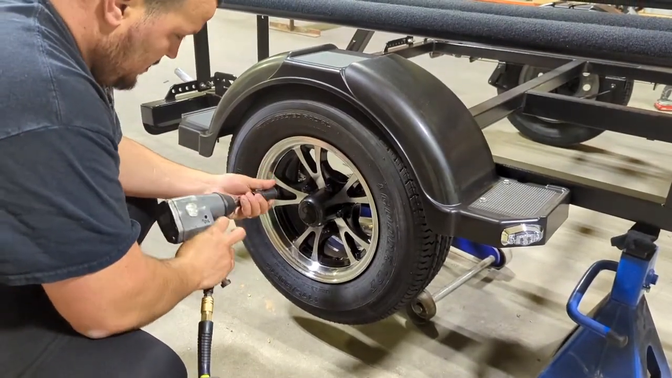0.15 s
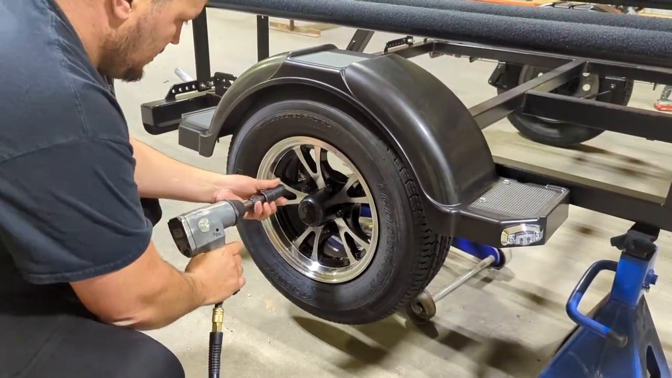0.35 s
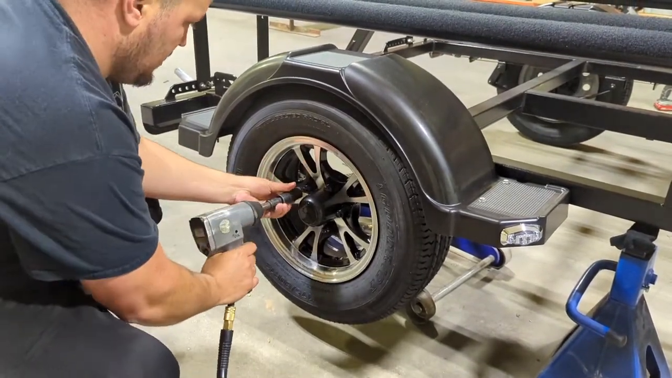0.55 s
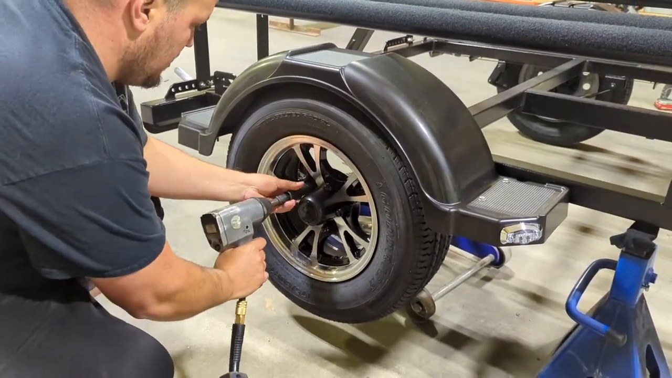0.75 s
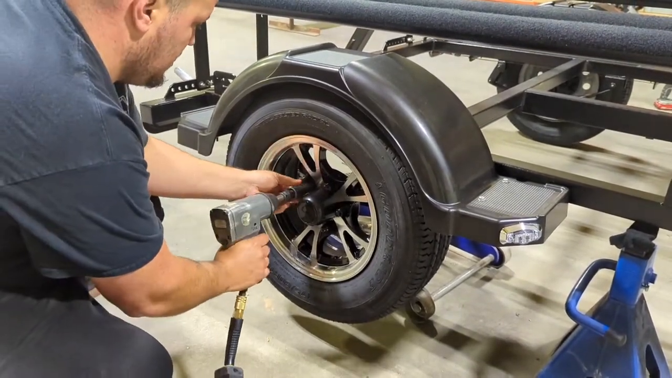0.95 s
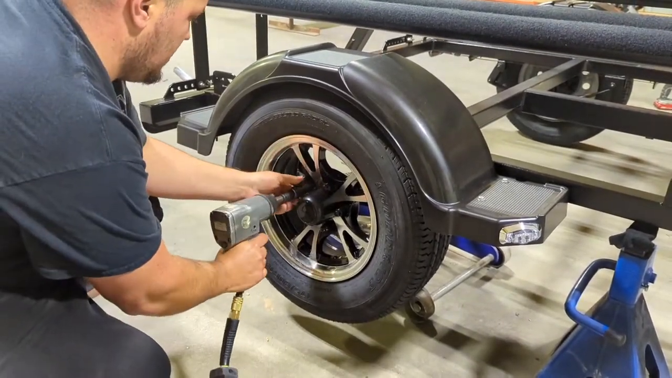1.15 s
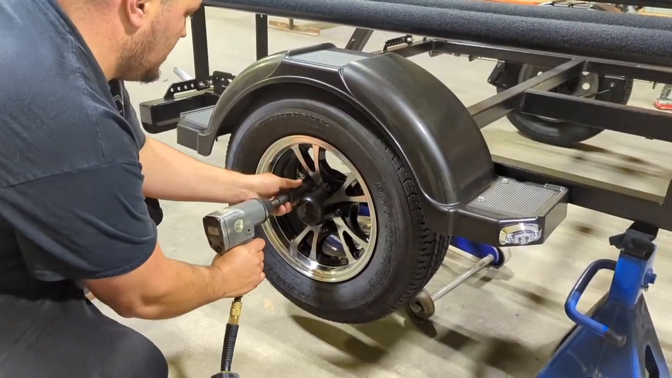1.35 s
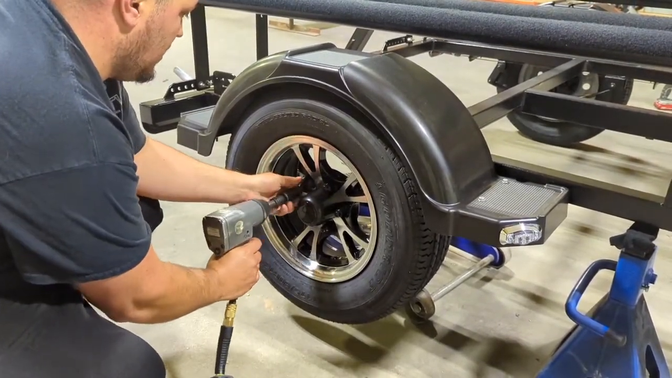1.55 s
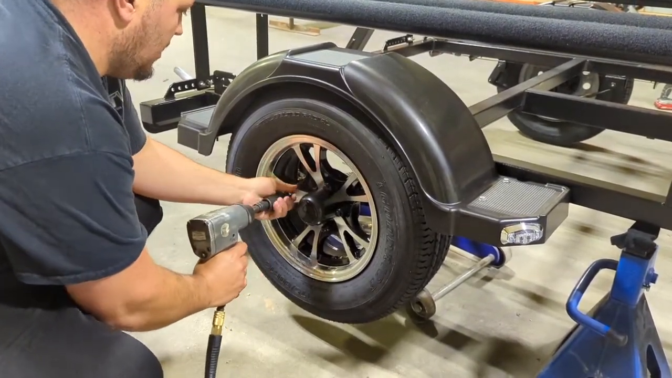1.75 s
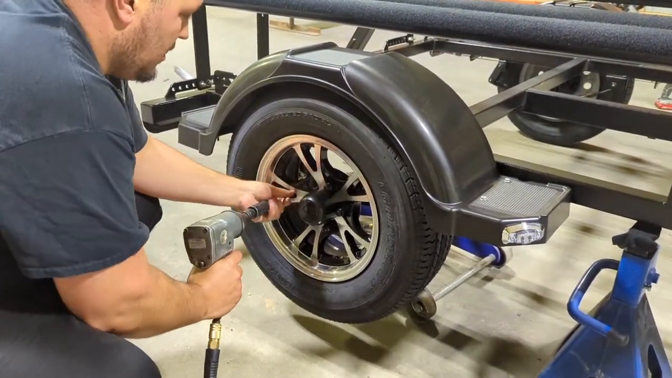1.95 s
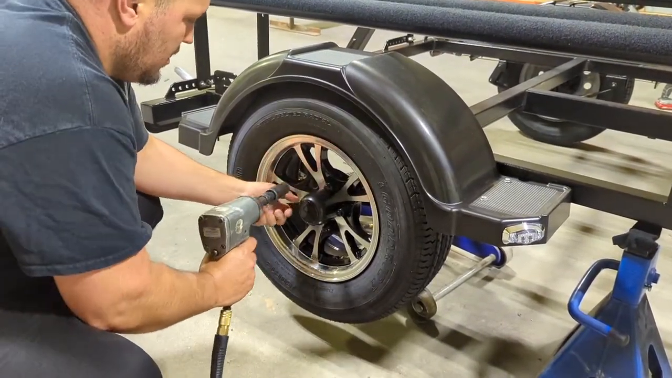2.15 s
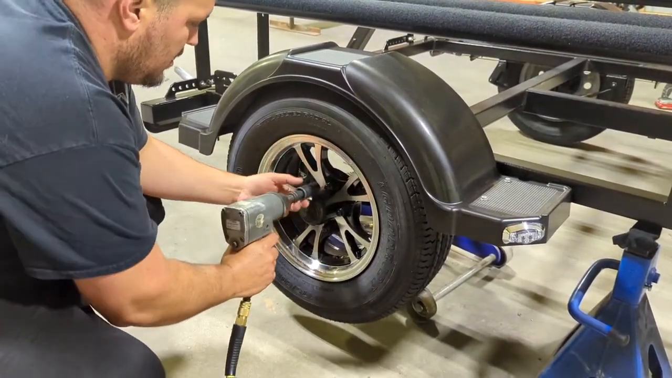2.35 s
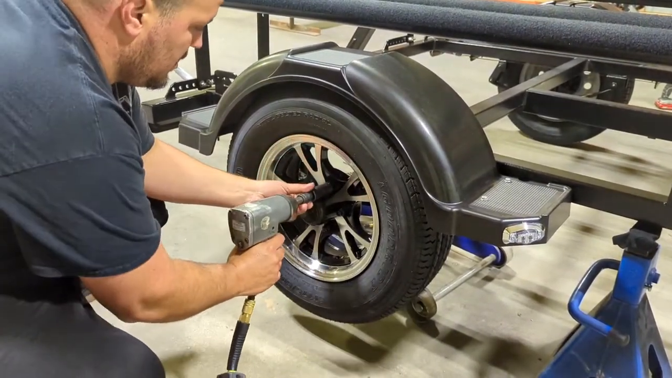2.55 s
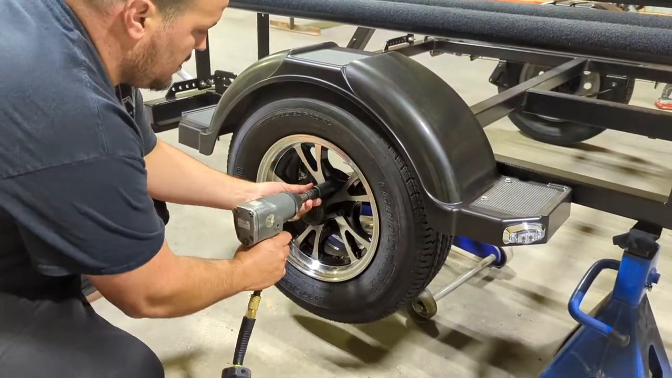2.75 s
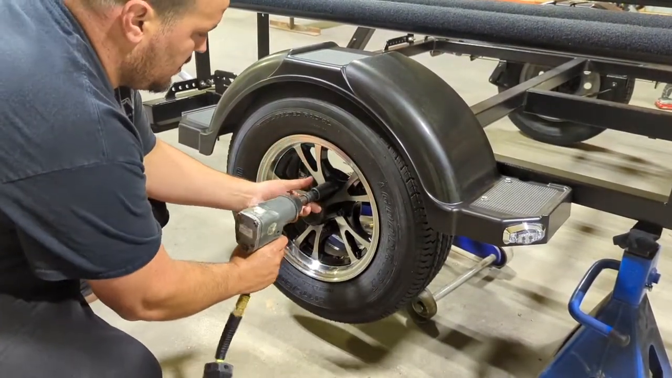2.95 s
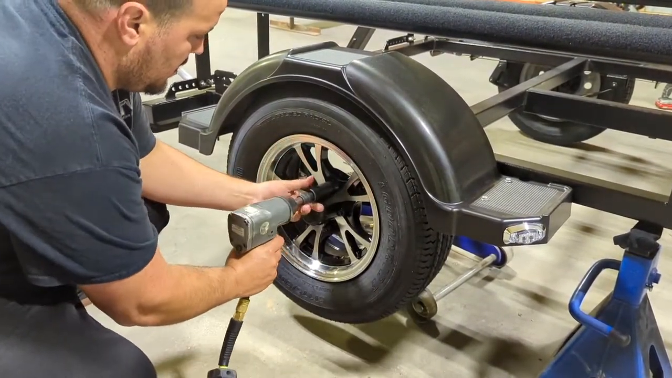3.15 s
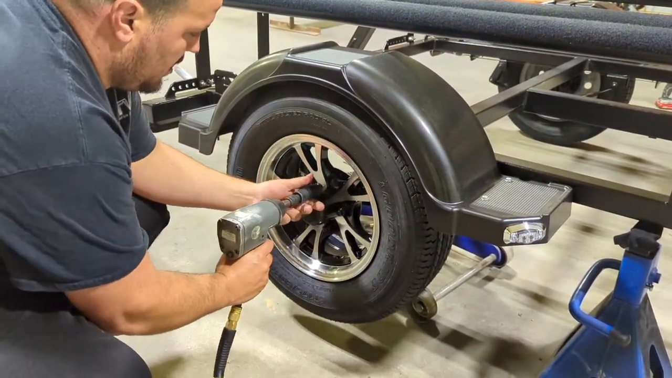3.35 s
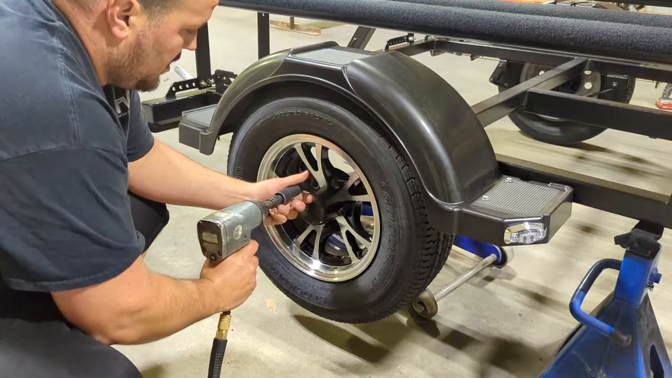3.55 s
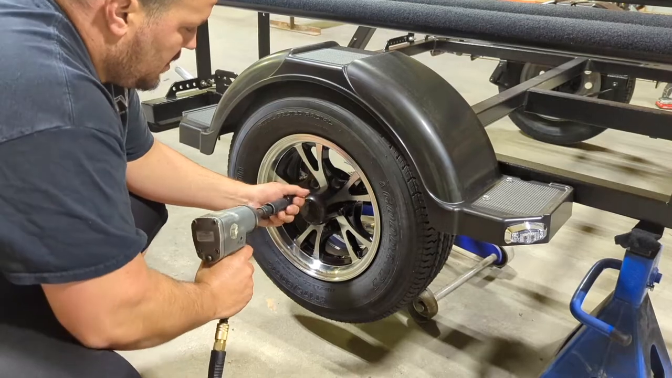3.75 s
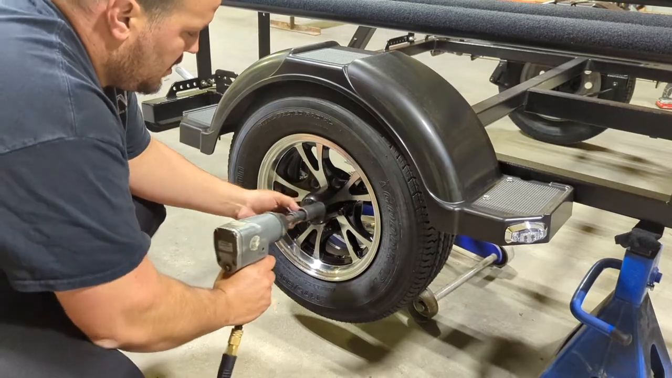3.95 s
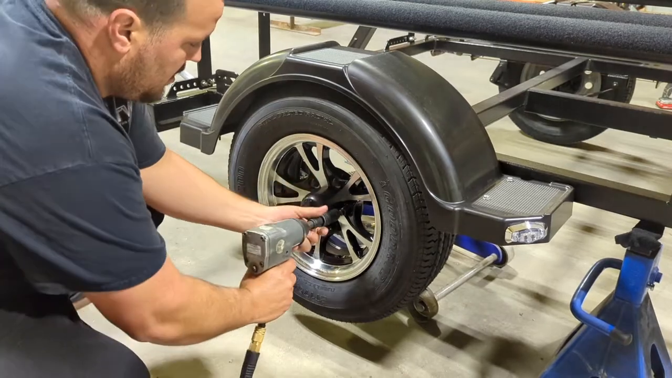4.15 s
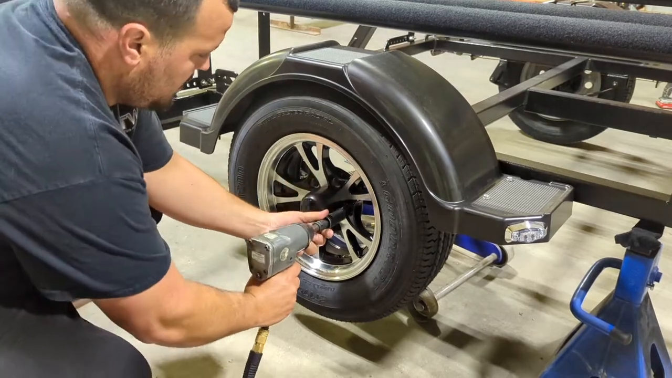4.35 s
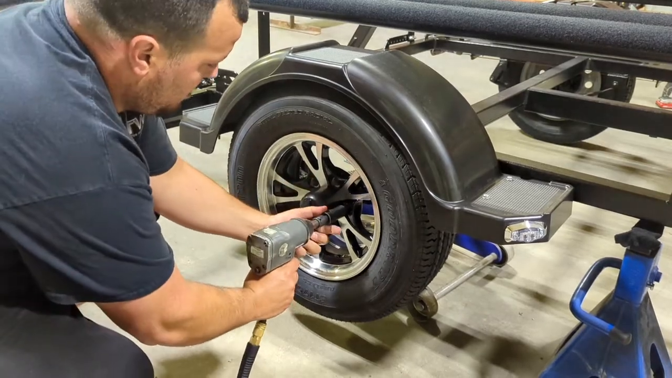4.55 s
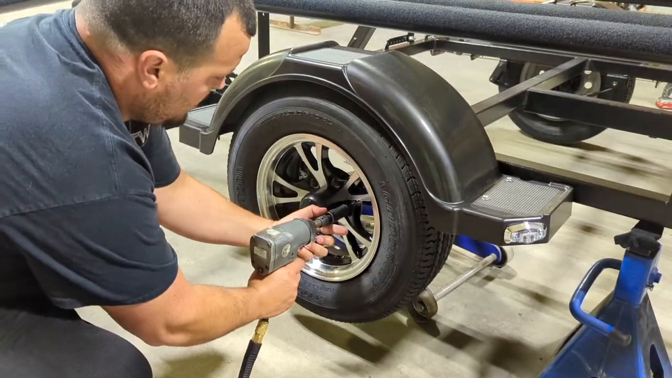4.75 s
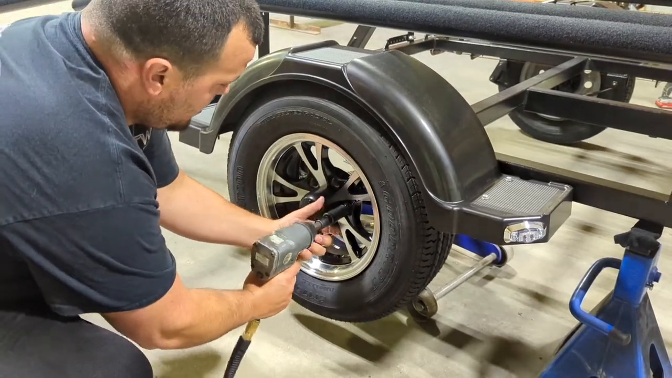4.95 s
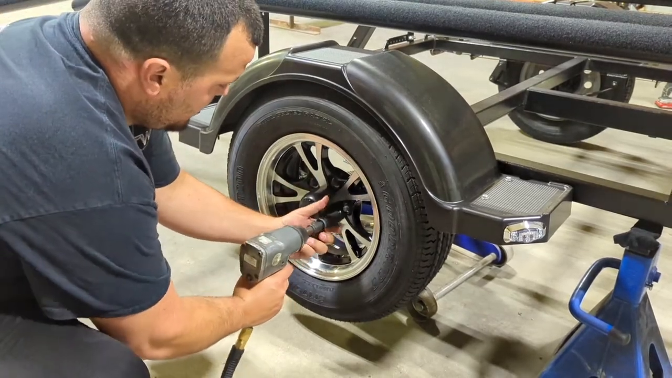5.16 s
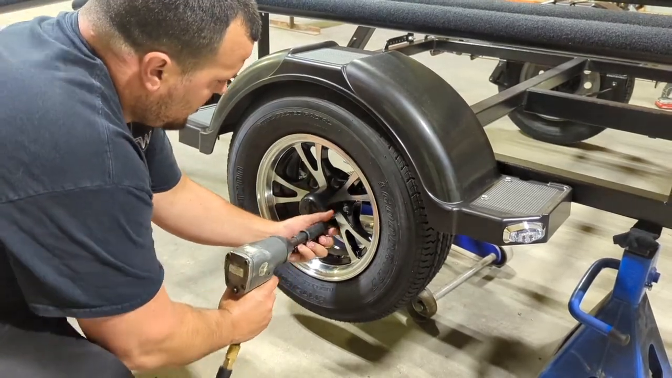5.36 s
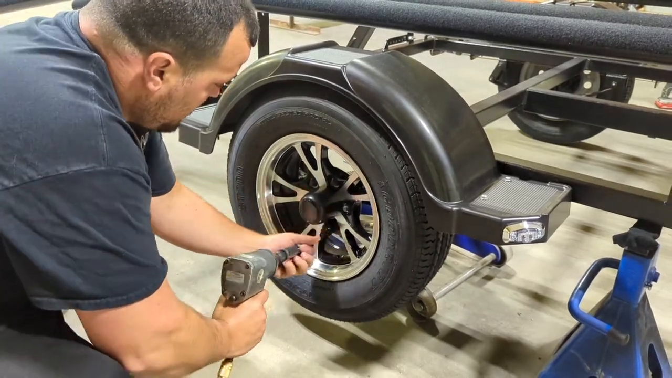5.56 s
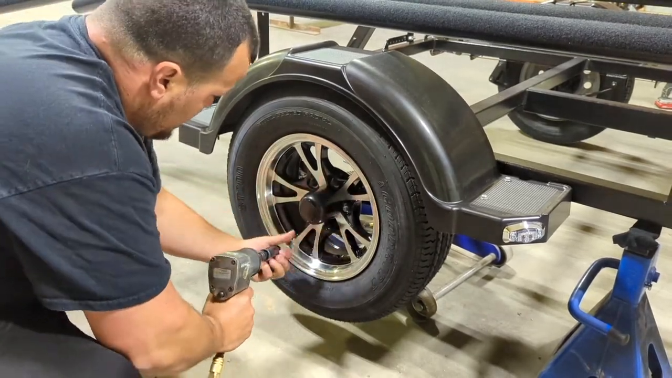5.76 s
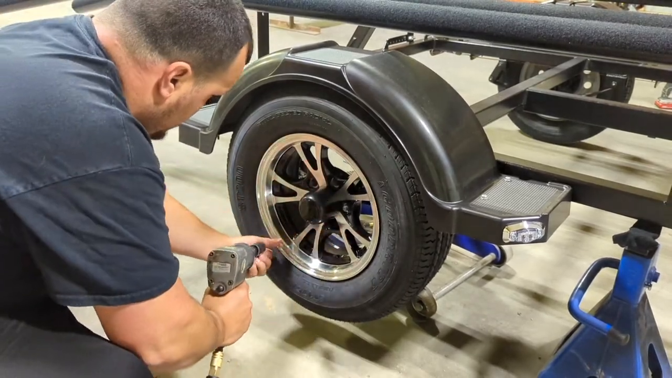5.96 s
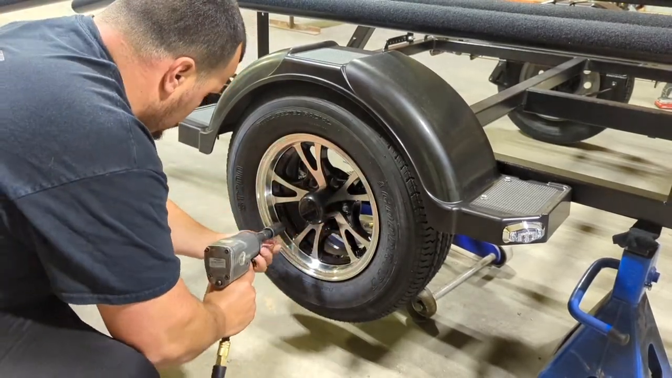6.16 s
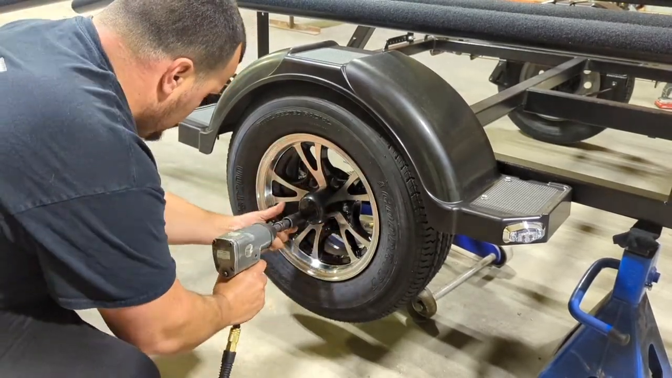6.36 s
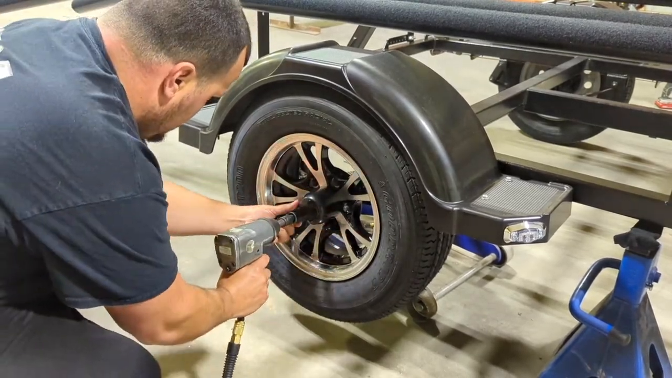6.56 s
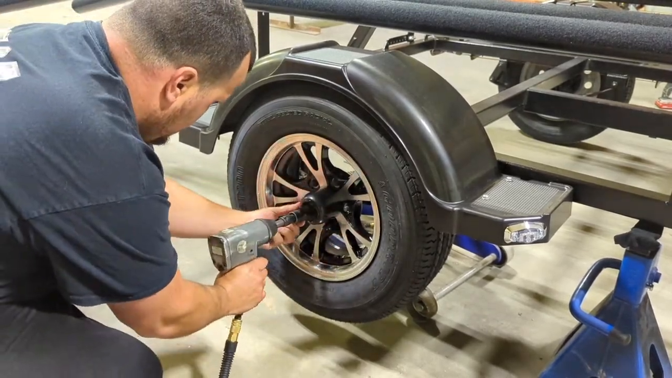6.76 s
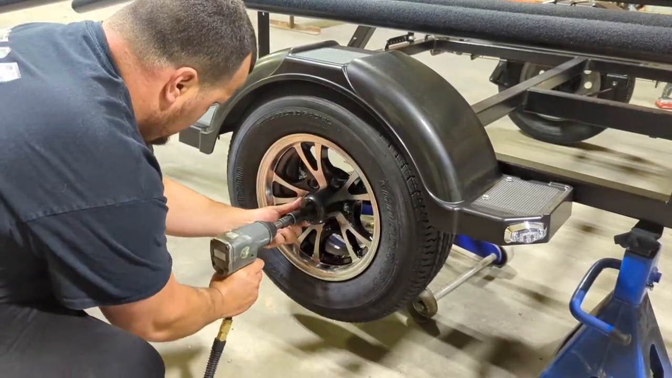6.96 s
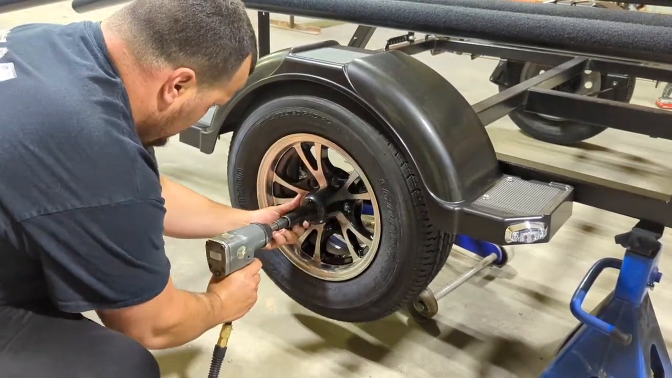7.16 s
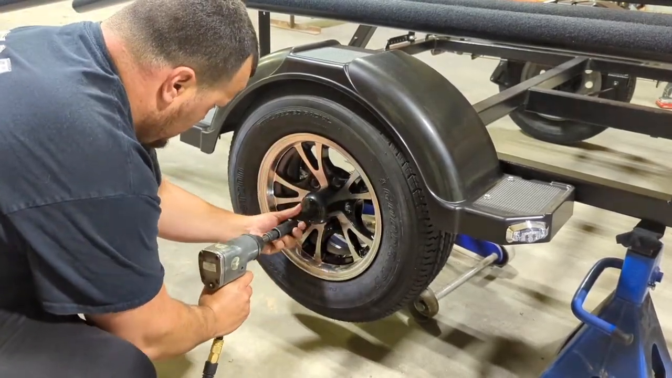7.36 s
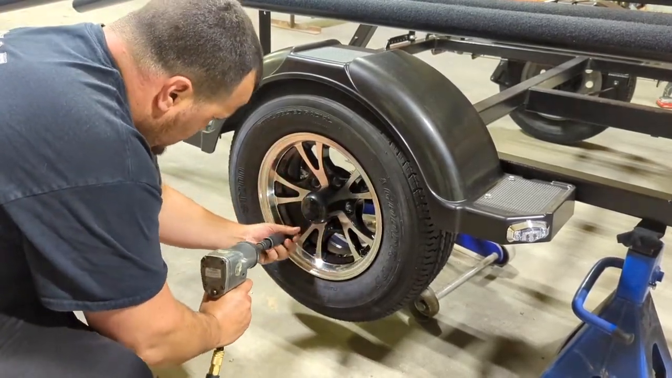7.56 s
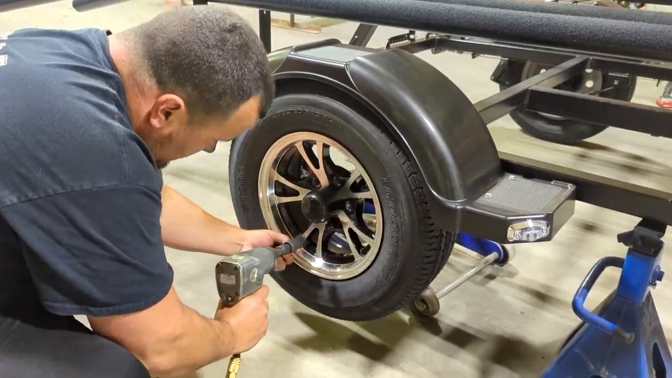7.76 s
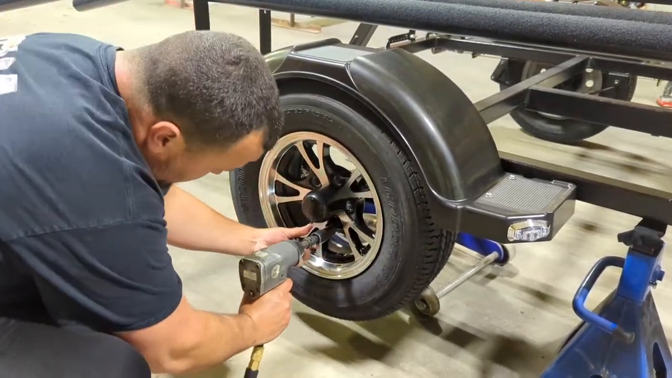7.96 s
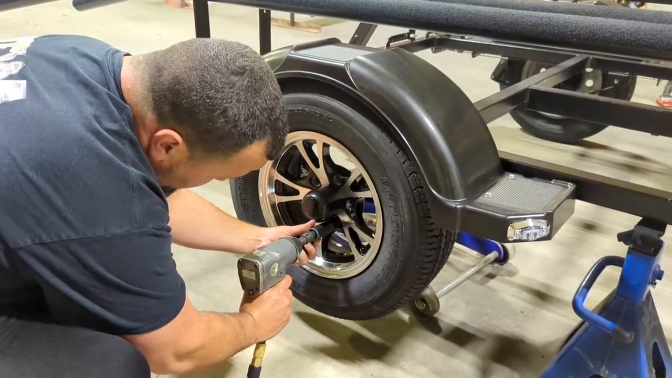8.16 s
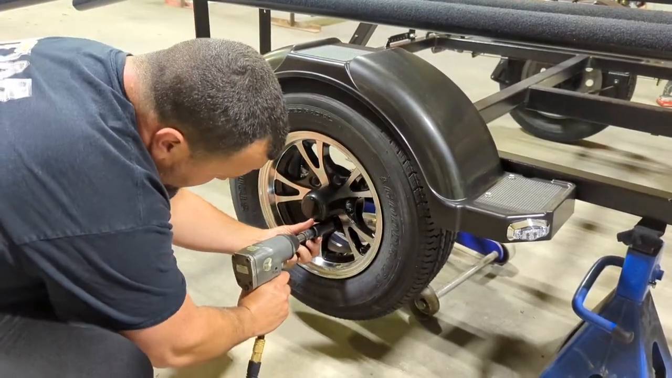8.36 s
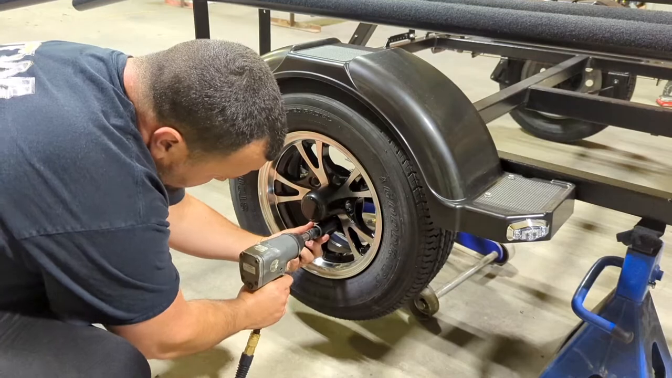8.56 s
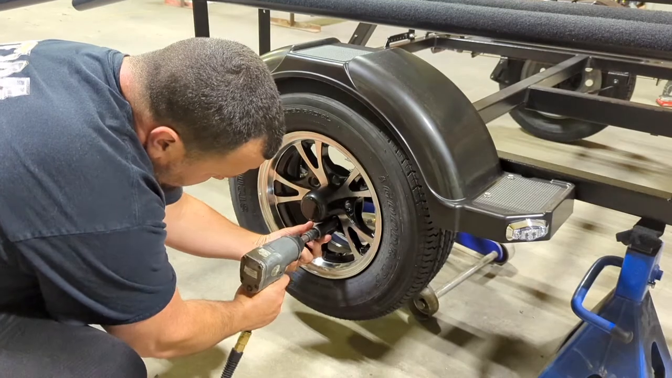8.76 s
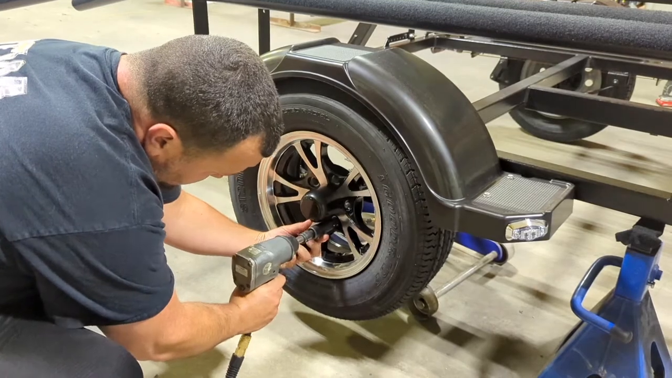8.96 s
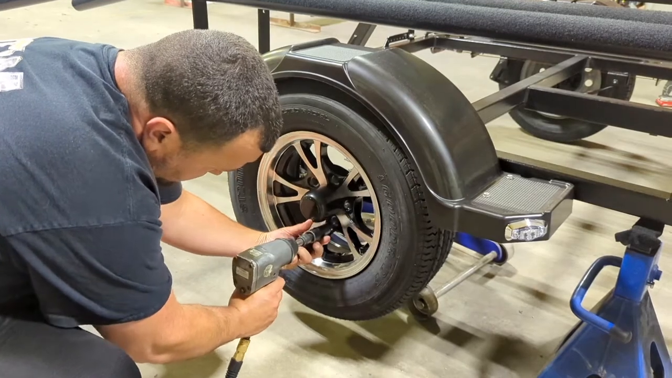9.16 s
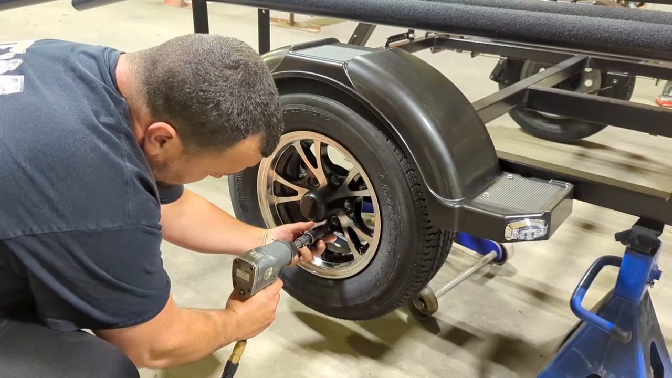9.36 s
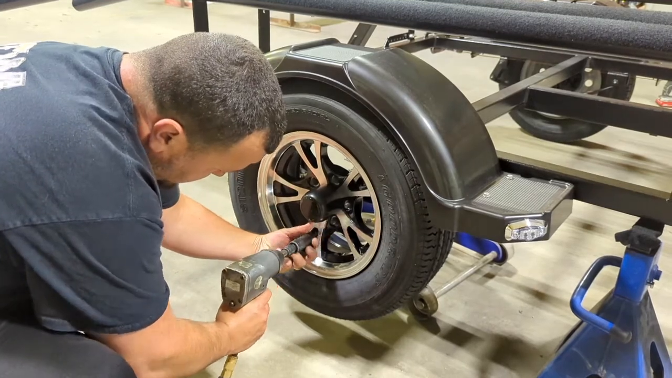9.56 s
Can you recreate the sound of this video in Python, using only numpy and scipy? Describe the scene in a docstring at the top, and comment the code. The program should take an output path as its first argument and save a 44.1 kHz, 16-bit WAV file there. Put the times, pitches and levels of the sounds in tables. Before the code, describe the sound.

Close stereo sound of a pneumatic impact wrench working around a trailer wheel. Soft fumbling and clinks come first, followed by a paired burst and then four separate short bursts. Each revs up sharply with throbbing air, then whines downward while the loose socket chatters. Between them, the socket knocks on nuts and spokes, rubs grittily, and a hose coupling hisses thinly. Hard workshop echoes, low distant air and hum.

```python
"""An air impact wrench spins five lug nuts off a trailer wheel, heard by a stereo pair in a large workshop.
Each trigger pull revs a vane motor: harmonics of the vane rate whine through port resonances in a rush of
throbbing noise, then coast down under chatter and slaps of the socket. Between pulls, noise bursts through
metal modes knock on nuts and spokes, and gritty noise rubs. Decaying noise echoes give the room; behind lie
mains hum, distant shop air and a leaking hose coupling."""
import sys
import numpy as np
from scipy import signal
from scipy.fft import rfft, irfft, next_fast_len
from scipy.io import wavfile
from scipy.ndimage import uniform_filter1d

SR = 44100
rng = np.random.default_rng(int(sys.argv[2]) if len(sys.argv) > 2 else 0)


def log_audio(samples):
    """Write samples as a 16-bit WAV file to the path given in sys.argv[1]."""
    # one column per channel
    frames = np.atleast_2d(samples).T
    # limit to full scale, then quantise
    limited = np.clip(frames, -1, 1)
    pcm = np.round(limited * 32767).astype(np.int16)
    wavfile.write(sys.argv[1], SR, pcm)


N = 423801

# Distant shop air, spectral density: pitch_hz, level_db (relative)
SHOP_AIR = [(15, -81.5), (25, -55.5), (56, -9), (112, -8.5), (146, -27), (181, -5), (207, -18), (243, -37),
            (301, -21), (354, -71), (515, -54.5), (2780, -23.5), (15000, -74.5)]
# Mains hum lines: pitch_hz, level_db (middle sine amplitude)
HUM_LINES = [(118.4, -53.5), (179.6, -44.5), (239.4, -54), (360.7, -69), (393.0, -81.5)]
# Reverberation time of the workshop: pitch_hz, t60_s
SHOP_T60 = [(100, 1), (800, 0.62), (2000, 0.48), (5500, 0.26), (15000, 0.093)]
# Level balance between the two microphones: pitch_hz, left_minus_right_db
STEREO_BALANCE = [(60, -4), (110, 1), (200, -1.5), (380, 0), (700, -1.5), (1290, 3), (2380, 2.5),
                  (4400, -11), (8120, 2), (15000, 0.5)]
# Socket moving from nut to nut: start_s, right_lag_ms (right microphone behind left)
NUT_POSITIONS = [(0, 0.51), (2.3, 0.43), (4.1, .85), (6.051, .4), (8.2, 0.88)]

# Handling between pulls, one list a stretch: start_s, rub_db, leak_db (each before its trim)
HANDLING_MOVES = [
    [(0.0, -55.5, -79), (0.418, -56.5, -53.5), (0.562, -59.5, -76), (1.08, -47, -60)],
    [(2.1, -54, -70.5), (2.346, -63.5, -75.5), (2.51, -47.5, -74), (2.83, -39.5, -56)],
    [(3.7, -62.5, -54), (4.14, -54, -65.5), (4.448, -36, -63), (4.678, -48, -60), (4.83, -31, -47)],
    [(5.72, -51, -69), (5.948, -79, -60), (6.354, -50.5, -66.5), (6.8, -42.5, -56)],
    [(7.85, -54.5, -71), (8.03, -38, -49.5), (8.25, -44, -67.5), (8.65, -44.5, -62)],
]
# Socket rubbing, spectral density: pitch_hz, level_db (relative)
RUB_SPECTRUM = [(180, -7), (300, -1), (459, -4.5), (577, -21.5), (738, -6.5), (1970, -3), (2920, -19.5),
                (6200, -17), (9960, -46.5), (15000, -56.5)]
# Hose coupling leak, spectral density: pitch_hz, level_db (relative)
LEAK_SPECTRUM = [(3530, -34.5), (6000, -2), (6980, -13.5), (9230, -2.5), (12100, -10), (14800, -4.5),
                 (16000, -5)]

# Knocks of socket and nuts: start_s, level_db, thud_db, clink_db, tick_db (these three relative to level_db),
# pan_db (left minus right), contact_s (scaled in each band)
KNOCK_EVENTS = [(.1421, -44, -13, 2, -15, -1, .005), (.2997, -38, -11, -2, -33, -1.5, .0073),
                (.703, -19, -8, -6, -18, -1, .004), (.7863, -30, -5, 1.5, -15, 5, .013),
                (.8064, -32, -8, -3, -8, 1, .005), (.9014, -26, 3, 0, -8, 6, .0059),
                (2.2772, -28, -7, -27, -1, 6, .0029), (2.5394, -23, -6, -15, -16, 1, .0055),
                (2.6078, -21, -3, -6, -12, 3.5, .01), (2.708, -24, 0, -2, -6, 15, .0077),
                (3.6143, -39, -6, 3, -28, 4, .009), (3.7318, -37, -8, 10, -30, 6, .0076),
                (3.8599, -26, -9, -30, 0, 0, .0056), (4.0233, -32, -5, -6, -4, 3, .0044),
                (4.1736, -25, -2, -30, -11, 9, .0034), (4.247, -13, -3, -2, -3, 10, .0063),
                (4.3313, -31, -13, 0, -33, -6, .011), (4.4107, -28, 2, -23, -17, 1, .0054),
                (4.4653, -29, -3, -21, -18, 9, .0057), (4.555, -27, 0, -17, -15, 2, .0066),
                (4.5692, -24, -3, -1, -18, 3, .0038), (4.6779, -25, -3, 0, 1, 4, .0069),
                (4.7277, -17, 0, -14, 1, 9.5, .0086), (5.7644, -23, -13, 6, -30, 0, .0037),
                (5.826, -32, -18, 2, -30, 2, .0093), (5.9342, -25, -11, -30, 8, -1, .0038),
                (6.088, -32, -18, -1, -30, 2, .0092), (6.2855, -36, -13, -4, -24, 1, .0097),
                (6.4592, -19, -8, -3, -7, 2, .006), (6.5137, -29, -23, -2, -8, 6, .0092),
                (6.5334, -17, -6, -3, -5, 4, .0046), (6.6719, -17, -5, -6, -11, 8.5, .01),
                (7.93, -34, -24, 2, -30, 1, .0059), (8.0347, -13, -3, -5, -8, 3.5, .0063),
                (8.2448, -24, -7, -9, -12, 1, .0088), (8.3111, -19, -8, -8, -21, 0, .0055),
                (8.3325, -19, -6, -4, -13, 13, .0072), (8.4358, -23.5, -12, -2, -30, 14, .0063),
                (8.5117, -19, -6, -9, -20, 8, .006), (9.2227, -21, -5, 2, -25, 5, .008),
                (9.5762, -29, -13, -15, -30, -1, .0071)]
# The hammer engages; one knock without its time: level_db, thud_db, clink_db, tick_db, pan_db, contact_s
HAMMER_CLACK = -16, -12, -10, -1, 3, .006
# Metal modes of wheel and socket: pitch_hz, width_hz, level_db (before each blow's own spread)
WHEEL_MODES = [(441, 160, -5.5), (850, 236, 0), (1104, 215, 1.5), (1571, 91, 2.5), (1972, 49, 1.5),
               (2252, 45, -12.5), (4120, 460, 1), (6600, 2600, 2), (15714, 1100, 1)]
# Resonances of the loose socket: pitch_hz, width_hz, level_db (relative)
SOCKET_MODES = [(3660, 1700, -6.5), (5380, 410, -1), (6730, 920, -2.5), (9550, 1000, -9.5),
                (15540, 550, 6.5)]
# Single slaps of the loose socket: start_s, level_db
SOCKET_SLAPS = [(1.7364, -5.5), (1.7685, -13), (1.9839, -22), (3.2186, -10), (3.2926, -18.5), (3.4472, -10),
                (5.15, -7.5), (5.4231, -7.5), (7.225, -7), (7.3781, -12.5), (7.3983, -12), (7.4598, -5),
                (7.5143, -12), (9.0608, -7.5), (9.2366, -13), (9.415, -22), (9.4554, -21.5),
                (9.4963, -23.5)]
# One long rattle of the socket: start_s, end_s, level_db
LONG_RATTLE = 7.376, 7.564, -27

# Trigger pulls: pull_s, release_s, top_vane_hz, whine_db, exhaust_db, jet_treble_db, chatter_db,
# coast_dip_db (change of the coasting whine around DIP_HZ)
TRIGGER_PULLS = [(1.094, 1.236, 519, -16.5, -22, -17, -45, -3),
                 (1.385, 1.468, 520, -17.5, -23, -19, -45, 1),
                 (2.835, 2.985, 531, -12.5, -21.5, -18.5, -25, -10),
                 (4.839, 4.991, 530, -14.5, -22.5, -20, -24, -6),
                 (6.811, 6.97, 540, -18.5, -21.5, -19.5, -29, -8),
                 (8.665, 8.805, 500, -17.5, -21.5, -19.5, -25, -2)]
# Exhaust air, spectral density: pitch_hz, level_db (relative)
EXHAUST_SPECTRUM = [(180, -25), (300, 0), (462, -2), (574, -22), (713, -1.5), (828, -44), (930, -9.5),
                    (1360, -2.5), (1580, -4), (2520, -2.5), (2880, -7), (6850, -7.5), (10700, -12.5),
                    (15200, -2.5), (16000, -35)]
# Exhaust ports and motor body: pitch_hz, level_db (relative)
PORT_RESPONSE = [(60, -8), (130, -1), (220, -1), (330, -5), (470, 0), (620, -8), (1030, 1), (1300, 1),
                 (1650, -4), (2100, -9), (3500, -24)]
# Vane harmonics 1 to 10: level_db (relative)
VANE_HARMONICS_DB = [-1, 0, 1, 3, 2, 0, -3, -4, -6, -8]

# Room and microphones
SHOP_AIR_DB = -48.5
WET_DB, KNOCK_WET_DB, WHINE_WET_DB = -1.5, -3.5, -7  # all room; extra for knocks; extra for the forward-beamed whine
MOTOR_LAG_MS = 0.24  # right microphone behind left
CUTOFF_HZ = 15900

# Motor speed and valve
START_HZ, REV_SHAPE = 110, 2.05  # least vane rate on the first gulp of air; power of the quarter-sine rev
COAST_S, AIR_DRAG = .33, .55  # bearing friction time; share of extra drag at top speed
VALVE_S = .022  # opening time

# Whine
WHINE_HZ, WHINE_LOSS_DB, WHINE_BEND = 370, 8, 2.3  # loudest vane rate; loss one octave off; power of the octaves
LOADED_DB = -4  # while revving, per octave under the top rate
DIP_HZ, DIP_OCTAVES = 290, .14  # centre and width of the brief coasting dip
NOTE_DB, NOTE_HZ, NOTE_LOSS_DB = -40, 160, 11  # bare vane note: level at its loudest rate; loss one octave off

# Exhaust and socket
AIR_FALL, TREBLE_FALL, CHATTER_FALL = 41.1, 51.7, 46  # after release, dB per s
BODY_HZ, RUMBLE_DB, RUMBLE_LOSS_DB = 260, -1.5, 19.5  # full rumble below this vane rate; re air; loss per octave above
CLACK_LATE_S, SLAP_S = .018, .003  # clack after the pull; decay time of a slap
TICKS_PER_S, TICK_DB = 8, -46  # faint stray ticks: mean rate, middle level


def seconds():
    """Time of every sample in s."""
    return np.arange(N) / SR


def from_db(db):
    """Decibels to an amplitude factor."""
    return 10 ** (np.asarray(db) / 20)


def rms_one(x):
    """Scale a signal to an rms of 1."""
    return x / np.sqrt(np.mean(x ** 2) + 1e-20)


def in_time(rows, **ends):
    """Each column of a table joined by straight lines, one value a sample."""
    s, *columns = np.transpose(rows)
    return [np.interp(seconds(), s, column, **ends) for column in columns]


def at_hz(points, hz):
    """A spectrum read on a log-frequency axis."""
    table_hz, values = np.array(points).T
    return np.interp(np.log(np.maximum(hz, 1)), np.log(table_hz), values)


def coloured(x, spectrum):
    """Filter a signal by a table of pitch_hz and level_db."""
    size = next_fast_len(N)
    hz = np.arange(size // 2 + 1) * SR / size
    return irfft(rfft(x, size) * from_db(at_hz(spectrum, hz)), size)[..., :N]


def band(x, low_hz, high_hz):
    """Keep the band between two frequencies."""
    sos = signal.butter(2, [low_hz, min(high_hz, .49 * SR)], "band", fs=SR, output="sos")
    return signal.sosfilt(sos, x)


def highpass(x, order, low_hz):
    """Keep what lies above a frequency."""
    return signal.sosfilt(signal.butter(order, low_hz, "high", fs=SR, output="sos"), x)


def decaying(x, decay_s):
    """Let every impulse die away exponentially."""
    return signal.lfilter([1], [1, -np.exp(-1 / (decay_s * SR))], x)


def drift(rate_hz):
    """Slow random wander of spread 1: noise through two equal low-pass poles."""
    r = np.exp(-2 * np.pi * rate_hz / SR)
    wander = signal.lfilter([1], [1, -2 * r, r * r], rng.standard_normal(N + SR))
    return rms_one(wander[SR:])


def resonances(x, table):
    """Parallel resonances of alternating sign."""
    out = 0
    for k, (pitch_hz, width_hz, level_db) in enumerate(table):
        r = np.exp(-np.pi * width_hz / SR)
        a = [1, -2 * r * np.cos(2 * np.pi * pitch_hz / SR), r * r]
        b = [(1 - r * r) / 2, 0, (r * r - 1) / 2]
        out = out + (-1) ** k * from_db(level_db) * signal.lfilter(b, a, x)
    return out


def evened(x, window_s):
    """Bring the running rms to 1."""
    return x / np.sqrt(uniform_filter1d(x ** 2, round(window_s * SR)) + 1e-12)


def right_late(x, lag_ms):
    """Sound reaches the right microphone after the left."""
    late = np.maximum(np.arange(N) - np.round(lag_ms * SR / 1000).astype(int), 0)
    return np.array([x[0], x[1][late]])


def shop():
    """Distant air noise, alike at both microphones in the bass, and steady mains lines with wandering levels."""
    mid, side = coloured(rng.standard_normal((2, N)), SHOP_AIR)
    side = highpass(side, 1, 900)
    air = from_db(SHOP_AIR_DB) * rms_one(mid + side * [[1], [-1]])
    t = seconds()
    hum = sum(from_db(level_db + 0.91 * drift(4)) * np.sin(2 * np.pi * pitch_hz * t)
              for pitch_hz, level_db in HUM_LINES)
    return air + hum


def room(x):
    """Dense workshop echoes, dying band by band; the bass reaches both microphones alike."""
    t, tail = np.arange(SR) / SR, 0
    for low_hz in 60 * 2. ** np.arange(9):
        mid, side = band(rng.standard_normal((2, SR)), low_hz, 2 * low_hz)
        apart = np.clip(low_hz / 2600, 0, 1)
        decay = from_db(-60 * t / at_hz(SHOP_T60, low_hz * np.sqrt(2)))
        tail = tail + (mid + apart * side * [[1], [-1]]) * decay
    tail *= np.minimum(t / 0.00045, 1)
    tail = tail / np.sqrt(np.sum(tail ** 2) / 2)
    return signal.fftconvolve(x[None], tail, axes=1)[:, :N]


def handling():
    """Gritty rubbing of the socket on nut and rim, and a thin hiss of air leaking at the hose coupling."""
    rub_db, leak_db = in_time(np.concatenate(HANDLING_MOVES))
    grit = rng.standard_normal(N) * from_db(5.7 * drift(48))
    rub = from_db(rub_db - 3.0) * rms_one(coloured(grit, RUB_SPECTRUM))  # trim -3 dB
    hiss = rms_one(coloured(rng.standard_normal((2, N)), LEAK_SPECTRUM))
    return rub + from_db(leak_db + 1.0) * hiss  # trim +1 dB


def knocks():
    """A brief skid of noise in four bands; each blow stirs the modes of wheel and socket with its own strengths."""
    out, t = np.zeros((2, N)), np.arange(round(.12 * SR)) / SR
    edges_hz = 350, 1400, 2800, 7000, 17000
    # the hammer engages on every pull but the second
    clacks = [(pull[0] + CLACK_LATE_S, *HAMMER_CLACK) for k, pull in enumerate(TRIGGER_PULLS) if k != 1]
    rows = list(KNOCK_EVENTS) + clacks
    strengths_db = rng.normal(0, 3, (len(rows), len(WHEEL_MODES)))
    whites = rng.standard_normal((len(rows), 2 * len(t)))
    band_lengths = np.array([[1.5], [1.1], [.9], [.8]])
    for row, white, own_db in zip(rows, whites, strengths_db):
        start_s, level_db, thud_db, clink_db, tick_db, pan_db, contact_s = row
        modes = [(hz, width, db + own) for (hz, width, db), own in zip(WHEEL_MODES, own_db)]
        metal = white + 2 * rms_one(resonances(white, modes))
        # the first half only lets the filters settle
        bands = np.array([rms_one(band(metal, low, high)[len(t):])
                          for low, high in zip(edges_hz, edges_hz[1:])])
        shape = np.minimum(t / .002, 1) * np.exp(-(t / (contact_s * band_lengths)) ** 1.5)
        body = from_db([thud_db, 0, clink_db, tick_db]) @ (bands * shape)
        sides_db = level_db + pan_db * np.array([[.5], [-.5]])
        at = round(start_s * SR)
        out[:, at:at + len(t)] += from_db(sides_db) * body[:N - at]
    return out


def chatter():
    """Loose socket: uneven touches once the load is off, and slaps, as noise bursts in the socket's resonances."""
    t, white = seconds(), rng.standard_normal(N)
    touches = (rng.random(N) < 150 / SR) * from_db(3 * np.minimum(rng.exponential(1, N), 2))
    bursts = decaying(touches, 0.0012) * white
    coasting = 0
    for _, release_s, _, _, _, _, chatter_db, _ in TRIGGER_PULLS:
        fall_db = CHATTER_FALL * np.maximum(t - release_s, 0)
        coasting = coasting + (t > release_s) * from_db(chatter_db - fall_db)
    start_s, end_s, rattle_db = LONG_RATTLE
    rattle = (t > start_s) * from_db(rattle_db - 260 * np.maximum(t - end_s, 0))
    slaps = sum((t > s) * from_db(db) * np.exp(-np.maximum(t - s, 0) / SLAP_S) for s, db in SOCKET_SLAPS)
    stray = (rng.random(N) < TICKS_PER_S / SR) * from_db(TICK_DB + rng.normal(0, 4, N))
    slaps = slaps + decaying(stray + 1e-18, SLAP_S)
    touching = (coasting + rattle) * rms_one(resonances(bursts, SOCKET_MODES))
    return touching + slaps * rms_one(resonances(white, SOCKET_MODES))


def flow_db(column, fall):
    """Air flow level: quick rise as the valve opens, held, then a steady fall; the loudest pull counts."""
    t, levels = seconds(), []
    for pull in TRIGGER_PULLS:
        rise_db = 40 * np.log10(np.clip((t - pull[0]) / VALVE_S, 1e-5, 1))
        levels.append(pull[column] + rise_db - fall * np.maximum(t - pull[1], 0))
    return np.max(levels, axis=0)


def exhaust(phase, vane_hz):
    """A ragged jet that throbs with the vanes, partly different at each microphone, over a body rumble."""
    air_db = flow_db(column=4, fall=AIR_FALL)
    treble_db = flow_db(column=5, fall=TREBLE_FALL)
    octaves_above = np.maximum(np.log2(vane_hz / BODY_HZ), 0)
    rumble_db = air_db + RUMBLE_DB - RUMBLE_LOSS_DB * octaves_above
    shared, left, right = rng.standard_normal((3, N))
    eddies = (shared + 2.04 * np.array([left, right])) * (1 + 0.35 * np.cos(phase))
    # oil and water spit through the ports
    spits = (rng.random(N) < 250 / SR) * rng.exponential(.4, N)
    rush = coloured(eddies * (1 + decaying(spits, 0.0012)), EXHAUST_SPECTRUM)
    body = band(rush, 300, 8000) / np.std(band(rush, 2500, 7000)) * from_db(2.2 * drift(40))
    treble = rms_one(highpass(rush, 4, 8000)) * from_db(2.5 * drift(30))
    rumble = from_db(-5.0) * rms_one(band(shared, 96, 364))
    return from_db(air_db) * body + from_db(treble_db) * treble + from_db(rumble_db) * rumble


def speed():
    """Vane rate in Hz: it revs while the trigger is held, then friction and air drag slow it."""
    t, hz = seconds(), np.full(N, 1.)
    for pull_s, release_s, top_hz, *_ in TRIGGER_PULLS:
        low_hz = max(hz[round(pull_s * SR)], START_HZ)
        held = np.clip((t - pull_s) / (release_s - pull_s), 0, 1)
        rev = low_hz + (top_hz - low_hz) * np.sin(np.pi / 2 * held) ** REV_SHAPE
        friction = np.exp(np.clip(t - release_s, 0, 2) / COAST_S)
        coast = top_hz / ((1 + AIR_DRAG) * friction - AIR_DRAG)
        hz = np.where(t < pull_s, hz, np.where(t < release_s, rev, coast))
    return hz


def whine_level_db(vane_hz):
    """Whine level: loudest near one vane rate, lower under load, with a brief dip on the way down."""
    t, pulls = seconds(), np.array(TRIGGER_PULLS)
    latest = np.maximum(np.searchsorted(pulls[:, 0], t) - 1, 0)
    _, release_s, top_hz, whine_db, _, _, _, dip_db = pulls[latest].T
    revving = t < release_s
    load_db = LOADED_DB * revving * np.log2(top_hz / vane_hz)
    loss_db = WHINE_LOSS_DB * np.abs(np.log2(vane_hz / WHINE_HZ)) ** WHINE_BEND
    dip = np.exp(-(np.log2(vane_hz / DIP_HZ) / DIP_OCTAVES) ** 2)
    return whine_db + load_db - loss_db + ~revving * dip_db * dip


def whine(vane_hz):
    """Every vane lets out a puff: harmonics of the vane rate, loud where they cross a port resonance."""
    phase = 2 * np.pi * np.cumsum(vane_hz * (1 + .005 * drift(30))) / SR
    wear = [from_db(4 * drift(25)) for _ in range(3)]  # three groups of harmonics waver apart
    puffs = 0
    for k, harmonic_db in enumerate(VANE_HARMONICS_DB, 1):
        strength = from_db(at_hz(PORT_RESPONSE, k * vane_hz) + harmonic_db)
        puffs = puffs + np.cos(k * phase) * strength * wear[k % 3]
    # turbulence in the ports
    breath = rms_one(resonances(rng.standard_normal(N), [(1086, 144, 0.0076), (1480, 170, 0.02)]))
    both = evened(puffs, .07) + from_db(-11) * breath
    # the bare vane note drones as the motor coasts
    note_db = NOTE_DB - NOTE_LOSS_DB * np.log2(vane_hz / NOTE_HZ) ** 2
    note = np.cos(phase) * wear[0] * from_db(note_db)
    level = uniform_filter1d(from_db(whine_level_db(vane_hz)), size=300)
    return level * both + note, phase


def scene():
    """Direct sound of wrench and wheel, the workshop's echoes, stereo balance and the shop behind."""
    vane_hz = speed()
    tone, phase = whine(vane_hz)
    noisy = exhaust(phase, vane_hz) + chatter() + handling()
    blows = knocks()
    moves_s, lags_ms = np.transpose(NUT_POSITIONS)
    nut = np.searchsorted(moves_s, seconds(), "right") - 1
    lag_ms = uniform_filter1d(lags_ms[nut], size=9000)
    direct = right_late(noisy + blows, lag_ms) + right_late([tone, tone], np.array(MOTOR_LAG_MS))
    blows_sent = from_db(KNOCK_WET_DB) * band(blows, 140, 10000)
    sent = (noisy + blows_sent).mean(axis=0) + from_db(WHINE_WET_DB) * tone
    left, right = direct + from_db(WET_DB) * room(sent)
    half = np.array(STEREO_BALANCE) * [1, .5]  # each side takes half the difference
    return np.array([coloured(left, half), coloured(right, half * [1, -1])]) + shop()


def record(dry):
    """Soft saturation rounds the peaks, then a steep low-pass cuts the top."""
    rounded = 1.15 * np.tanh(dry / 1.15)
    return signal.sosfilt(signal.ellip(12, .5, 65, CUTOFF_HZ, fs=SR, output="sos"), rounded)


dry = scene()
out = record(dry)
log_audio(out)
```